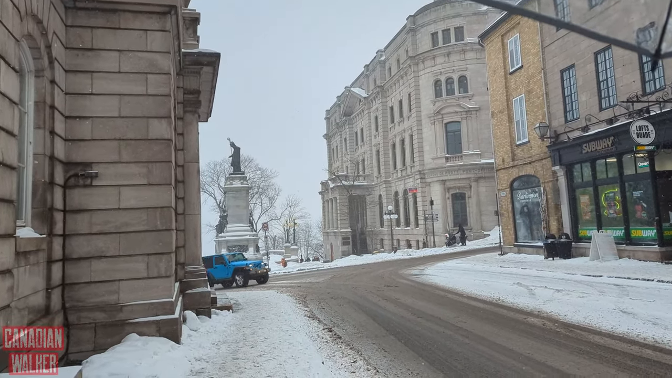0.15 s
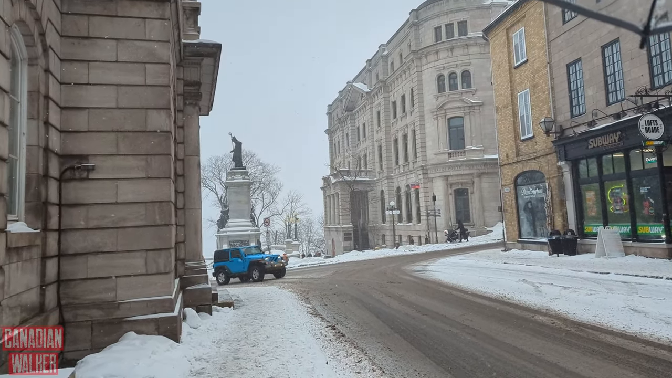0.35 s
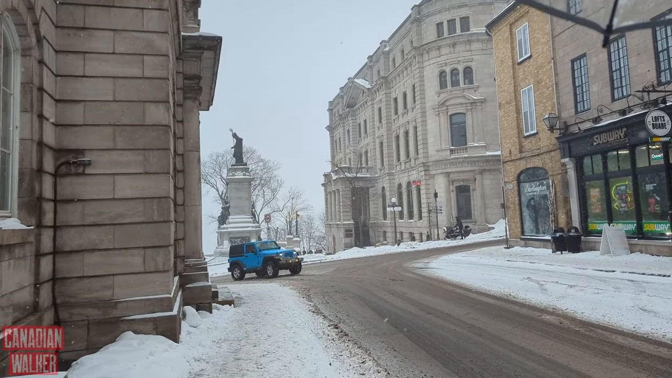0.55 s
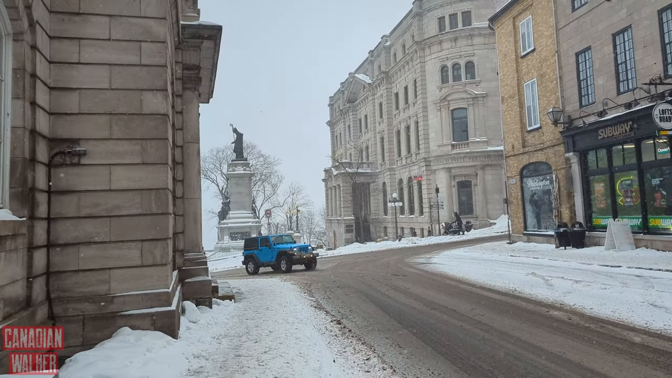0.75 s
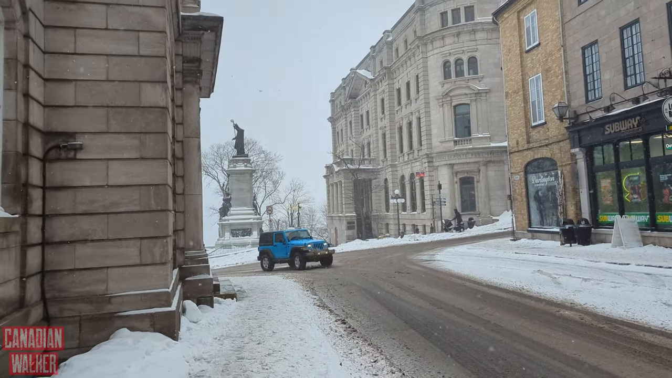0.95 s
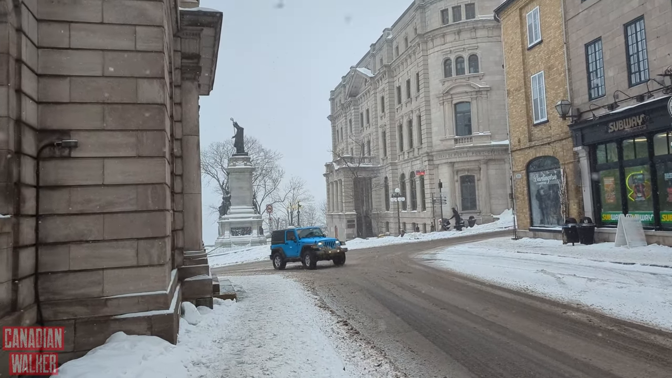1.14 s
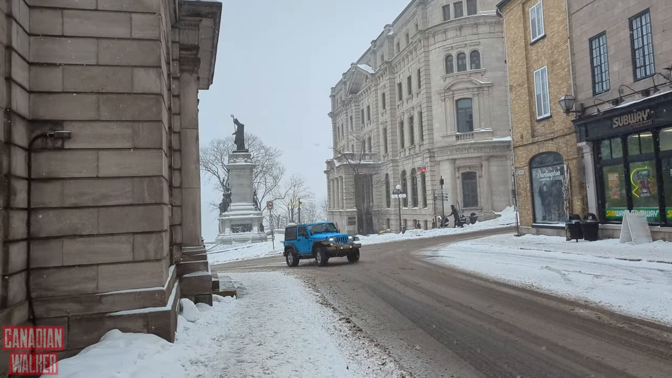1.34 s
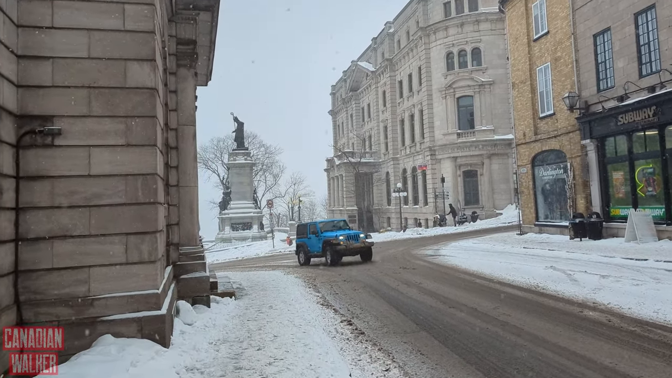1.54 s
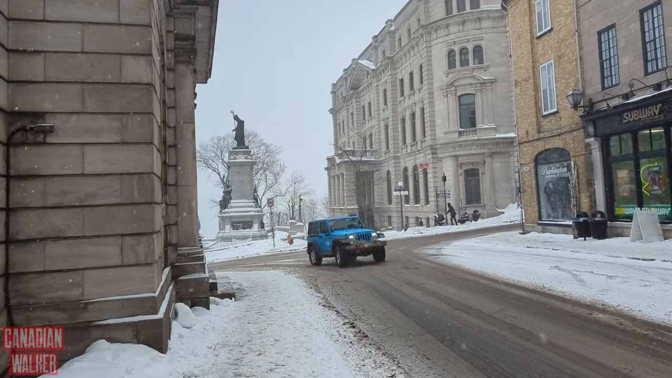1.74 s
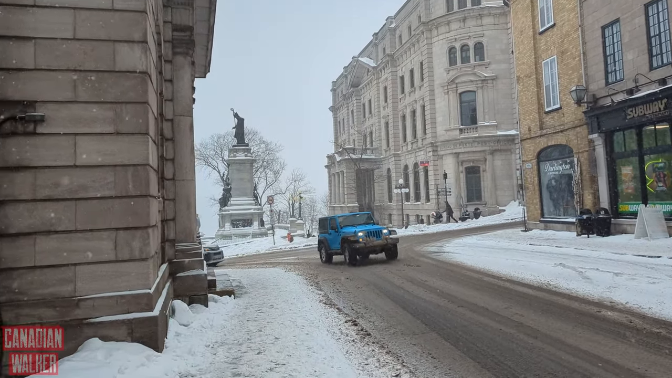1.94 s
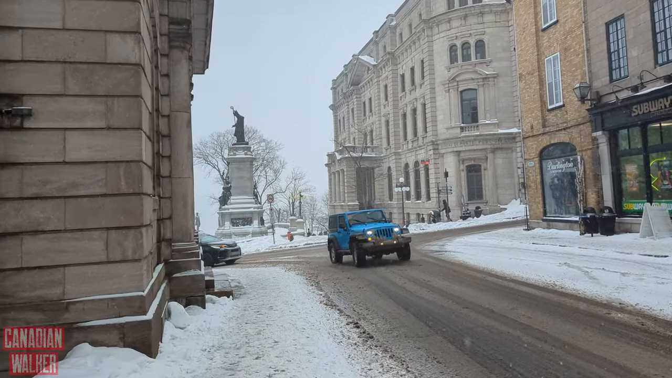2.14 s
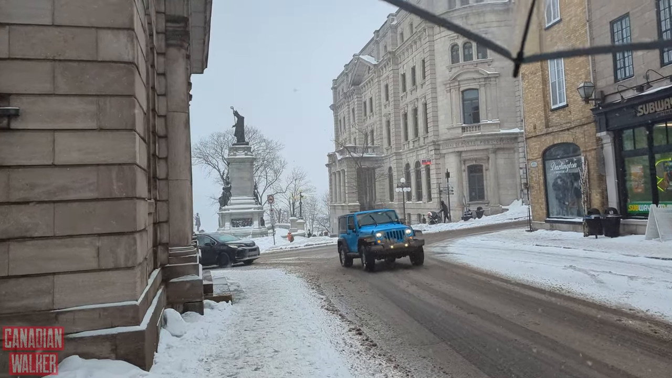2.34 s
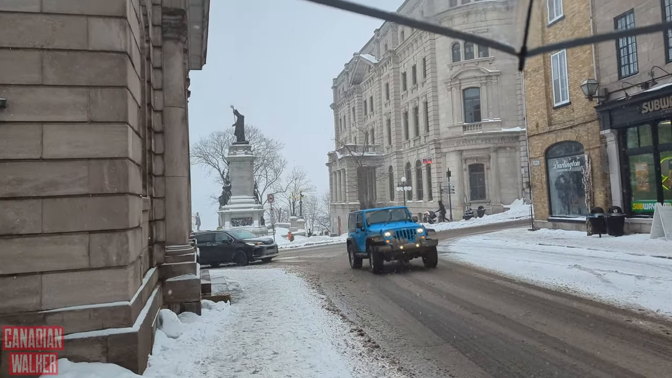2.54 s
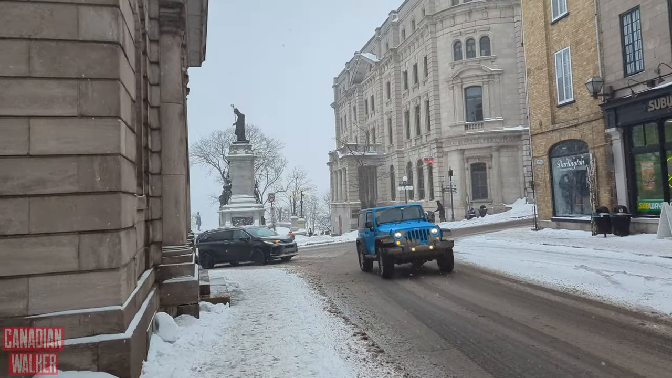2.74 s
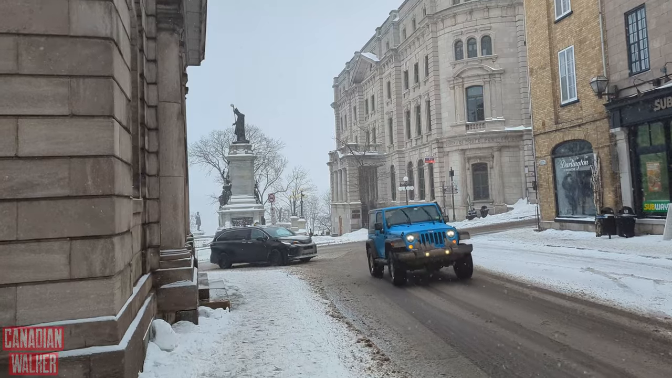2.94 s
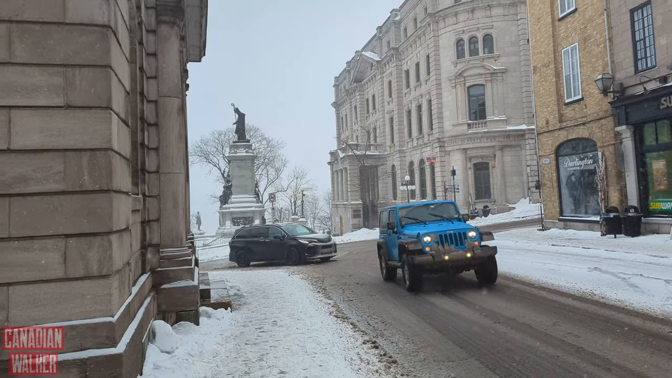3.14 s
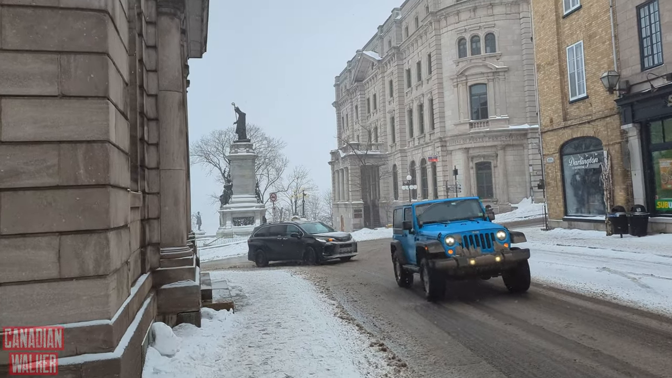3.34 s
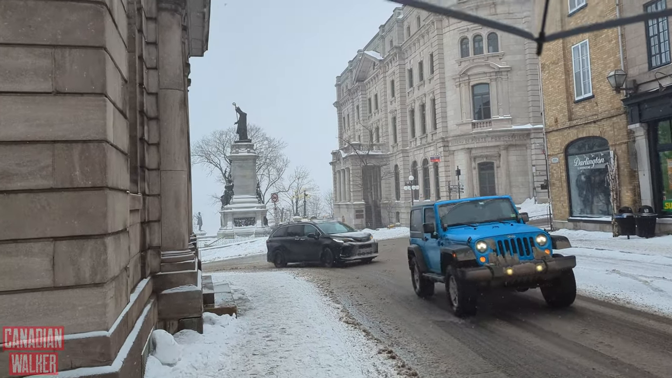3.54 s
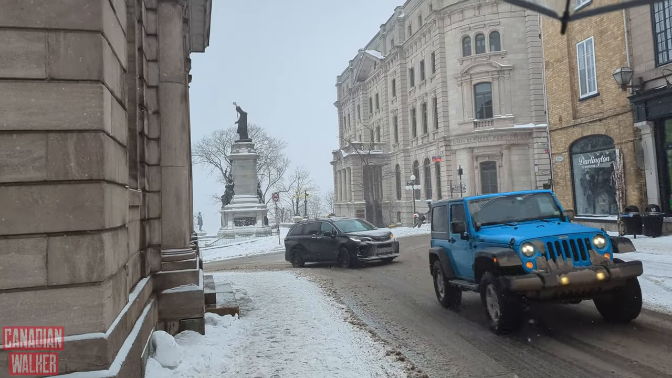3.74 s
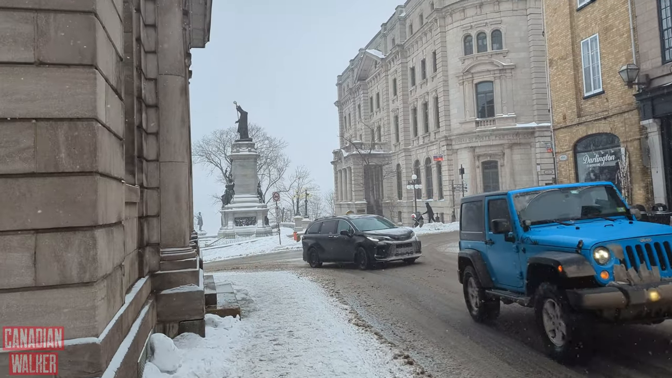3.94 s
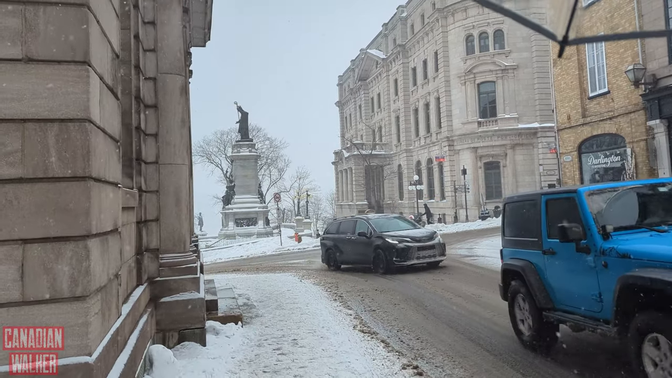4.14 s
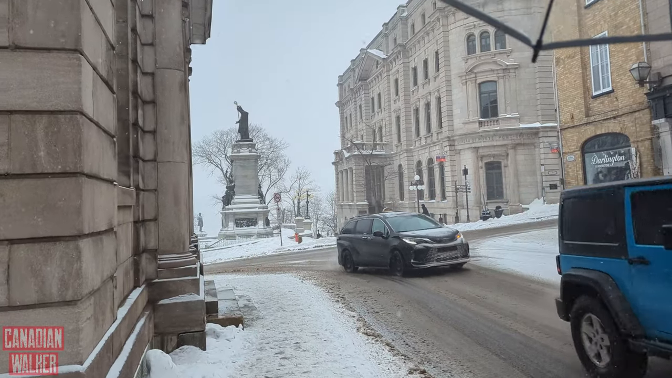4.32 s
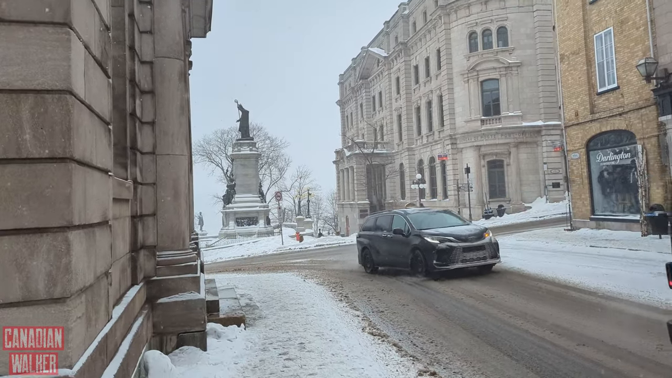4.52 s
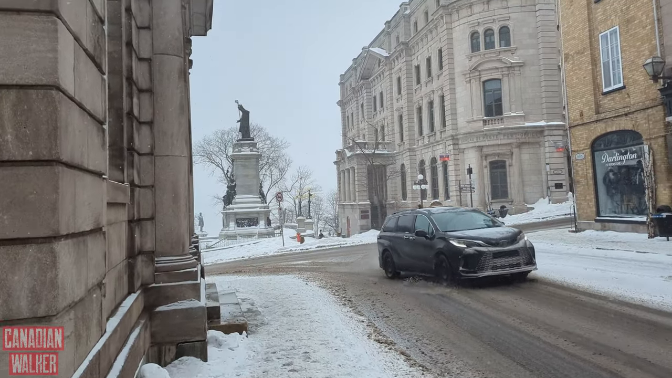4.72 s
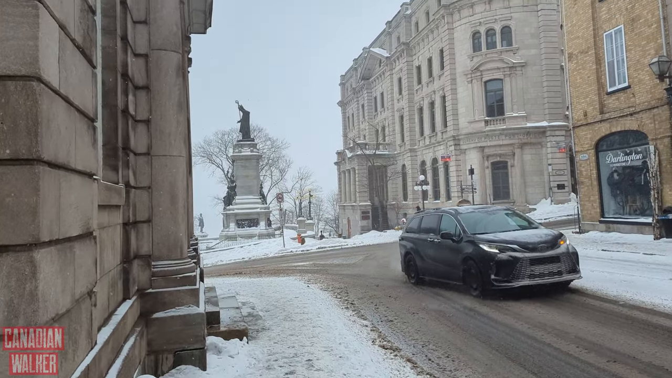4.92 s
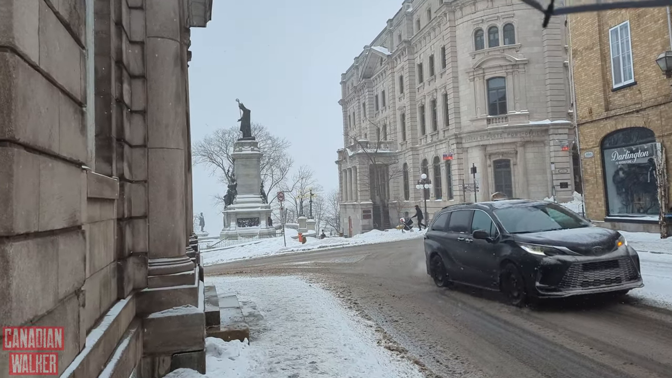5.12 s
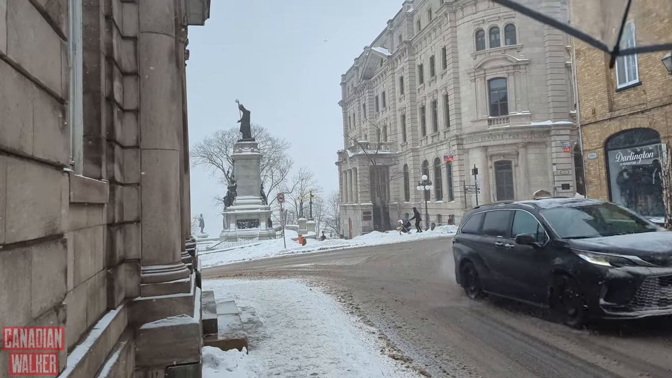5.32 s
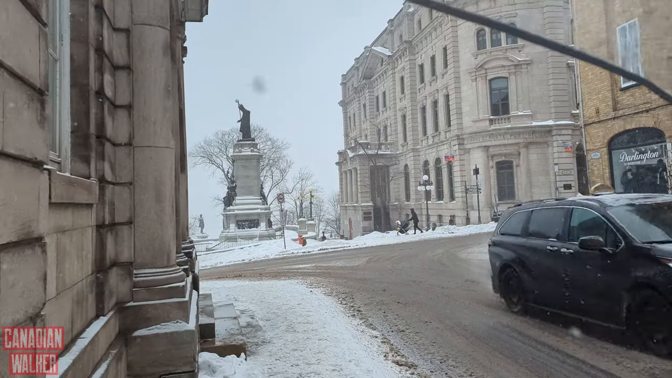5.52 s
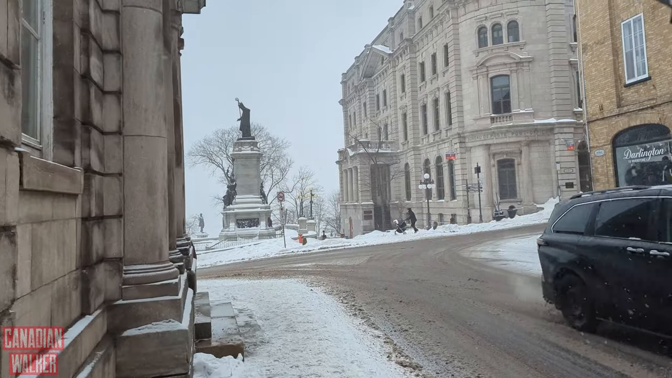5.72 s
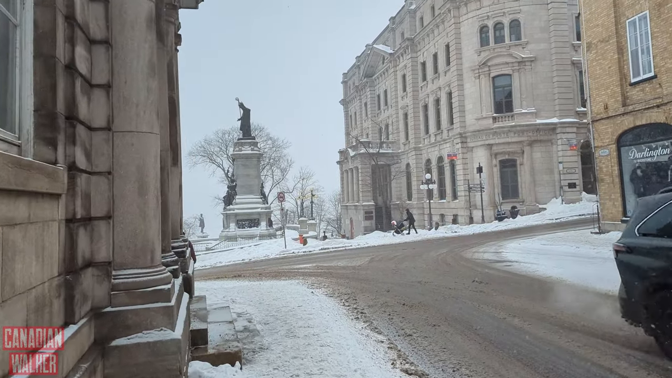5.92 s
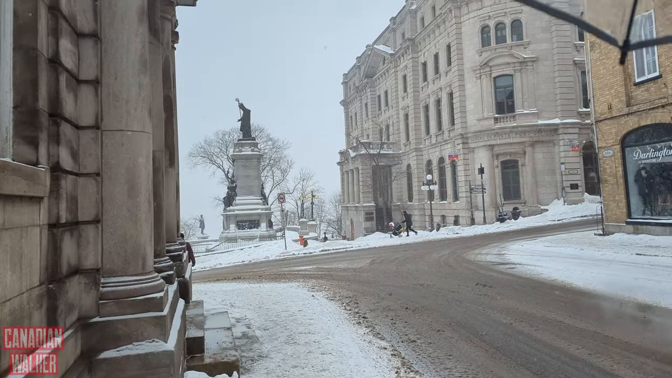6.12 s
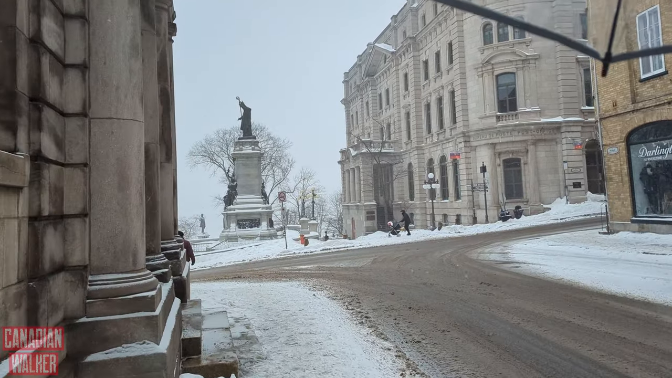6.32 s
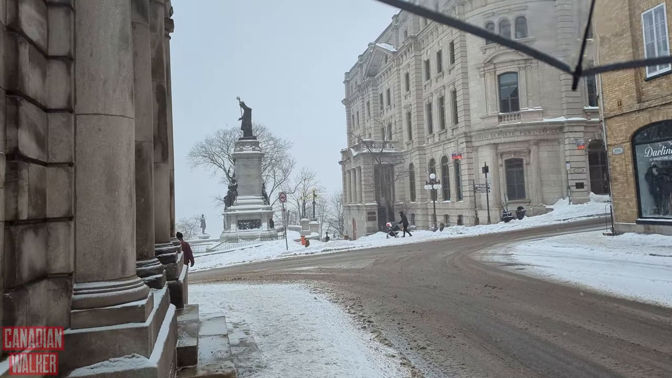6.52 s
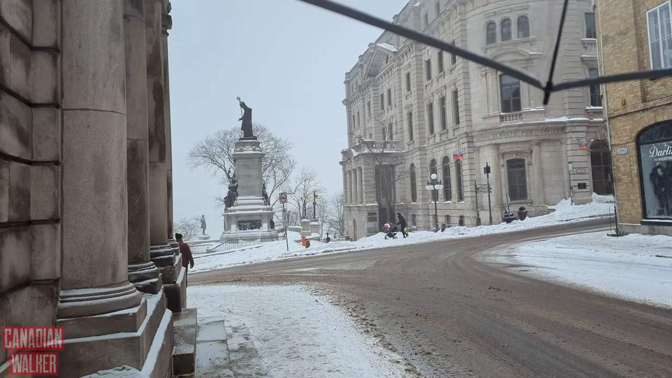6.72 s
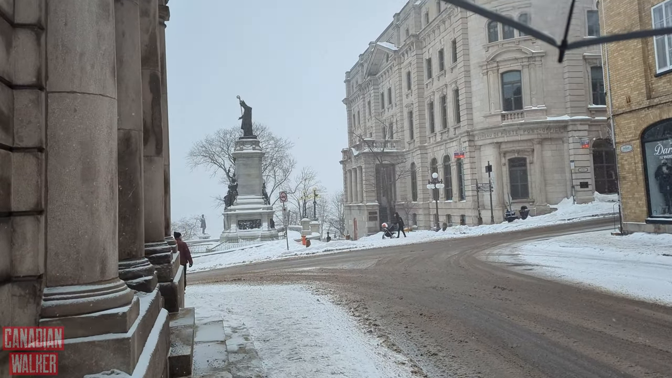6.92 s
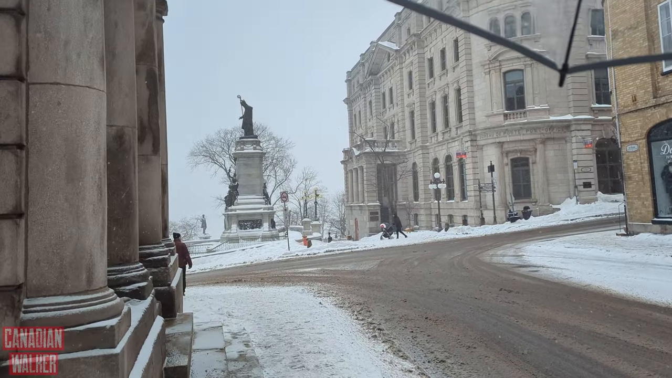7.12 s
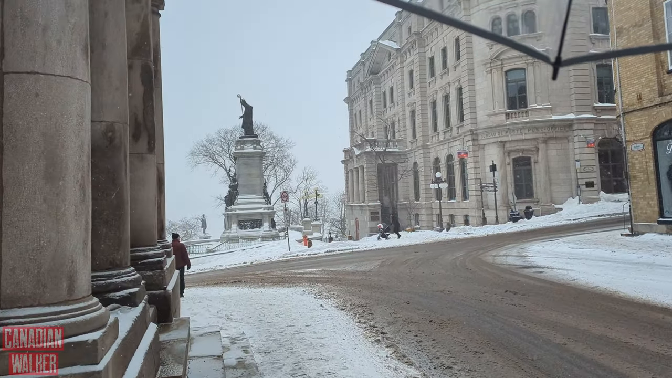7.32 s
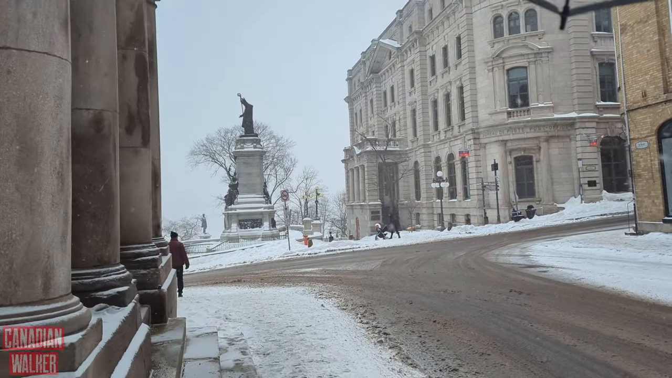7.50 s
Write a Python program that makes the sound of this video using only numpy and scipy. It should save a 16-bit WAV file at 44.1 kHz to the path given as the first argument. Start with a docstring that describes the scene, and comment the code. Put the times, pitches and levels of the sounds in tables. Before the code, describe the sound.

A walker's stereo microphone beside a stone building on a snowy city street. From 0 to 1 second there is mostly soft low rumble, faint distant tyre noise and dull wind thumps on the right. From about 1.3 seconds the tyres become clearer, a broad airy midrange roar with a slightly wandering tread tone, growing steadily. Around 3.4 to 4 seconds it swells strongly and bright, grainy slush spray joins; the first car sweeps to the right, spray strongest from 4 to 5. The second car follows almost without a gap, its roar full around 6 to 6.7 seconds with less hiss. After 6.9 it drops quickly, fading to distant wash by 7.5. Irregular short gusts buffet throughout, mostly right, with narrow low moans near 3.7, 4.1 to 4.7 and 6.6 seconds. The low end thins momentarily on one side or the other.

```python
"""Tyres of two cars roar past from left to right on a wet, slushy street between stone fronts.
The roar is shaped noise with a wandering tread resonance; the spray is treble hiss made grainy by slush.
Short bands of noise are gusts buffeting two microphones, mostly the right one; a few are narrow moans.
Low noise rumbles behind, and for moments the low end of tyres and rumble drops away on one microphone."""
import sys
import numpy as np
from scipy import signal
from scipy.fft import rfft, irfft
from scipy.io import wavfile
from scipy.ndimage import uniform_filter1d

SR = 44100
rng = np.random.default_rng(int(sys.argv[2]) if len(sys.argv) > 2 else 0)


def wav_out(sig):
    """Save sig, one row per channel (or a flat mono array), as 16-bit PCM at SR to the path in sys.argv[1]."""
    wavfile.write(sys.argv[1], SR, np.round(np.clip(np.atleast_2d(sig).T, -1, 1) * 32767).astype(np.int16))


def decibels_to_gain(level_db):
    """Convert a level in decibels to a linear amplitude gain (20 dB per decade)."""
    exponent = np.asarray(level_db, float) / 20
    return 10 ** exponent


N = 333396  # length [samples]
FRAME, HOP = 1024, 256  # short-time spectra [samples]

# Tyres on the wet street: (time [s], roar before a 2 dB lift [dB], spray over roar before a 1.5 dB lift [dB],
# tread resonance less 1.5 dB [dB], tilt about 2 kHz [dB per octave, one octave each way], resonance [Hz])
TYRES = [(0.0, -43, -10, 3.5, 2.3, 2060), (0.55, -47, -6.5, 4, 2.3, 2150), (0.95, -44, -11, 5, 0.6, 2060),
         (1.28, -36.5, -15.5, 6, 1, 1950), (1.56, -38, -10, 4.5, 0.6, 2100),
         (2.21, -34, -12, -1.5, -0.7, 2130), (3.37, -29.5, -5.5, 2.5, 2.4, 2020),
         (3.54, -27, -5.5, -0.5, 1.1, 2070), (3.98, -26, 0.5, 2, -0.2, 2130), (4.59, -23, 2, 7, -3.8, 2240),
         (4.74, -23.5, 2, 2.5, -1.2, 1900), (4.84, -27, 4, 0, -0.5, 2240), (4.88, -24, 3, 1, 0, 2000),
         (5.07, -23.5, 1, 5, 1.8, 2190), (5.33, -24.5, -4, -1, 0.7, 2150), (5.69, -25.5, -3.5, 2, 0, 2080),
         (6.08, -22.5, -4, 6, -1, 2170), (6.38, -23, -3, 5, -0.2, 2110), (6.48, -22.5, -4.5, 3, 1.2, 2000),
         (6.65, -23, -6, 7, 0.5, 2050), (6.89, -29, -4, -2, -1, 1920), (7.01, -28.5, -9.5, -0.5, 0.2, 1970),
         (7.48, -34, -9.5, 2.5, 4.2, 2250), (7.56, -35.5, -10, -1, 4.5, 2150)]
# Colour of the roar before resonance, tilt and dip: (frequency [Hz], relative density [dB])
ROAR_COLOUR = [(300, -60), (450, -36), (600, -23.5), (800, -14.5), (1000, -6.5), (1400, -2), (2200, -3.5),
               (3300, -4.5), (4200, -12.5), (6000, -17), (9000, -27)]
# Four bands of the roar that swell and thin on their own:
# (time [s], boost at 663 Hz [dB], at 974 Hz [dB], at 1465 Hz [dB], at 3000 Hz [dB])
BAND_SWELLS = [(0, 3.6, 3.5, 0.89, 2), (.9, 26, 3.5, 0.6, 3.9), (1.5, 3.2, -1, 4.3, 3.2),
               (2.0, 8.5, 0, 4.2, 3.6), (2.7, 2.4, -1.5, 6.1, 1.4), (3.35, 6.8, 8.5, 2.3, 1.5),
               (3.8, 2.2, -2.5, 1.8, 1.4), (4.4, 2.5, 5, 4.5, 5.5), (4.86, 16.3, 1, 1.2, 1.3),
               (5.3, 1.8, 6, 0.62, 3.8), (5.8, 1.9, 2.5, 2.1, 0.93), (6.5, 1.3, 7.5, 7.2, 0.71),
               (6.9, 18, 3, 4.6, 0.98), (7.3, 12, 8.5, 3.5, 0.79), (7.56, 7.9, 10, 1.7, 1.5)]
# A dip in the lower roar, perhaps the echo off the road cancelling the direct sound:
# (time [s], centre [Hz], depth [dB])
ROAD_DIP = [(0, 880, 3), (.7, 880, 3), (1.35, 850, 16), (1.75, 960, 6), (2.3, 900, -1), (2.8, 830, 5),
            (3.3, 1140, 3.5), (3.75, 1180, 12), (4.2, 1190, -1)]


def roar():
    """Air pumped out of the tread blocks: broad noise with a wandering resonance."""
    t, hz = grid()
    roar_db, _, tread_db, tilt_db, tread_hz = follow(TYRES, t)
    octave = np.log2(hz + 1)
    colour_db = read(ROAR_COLOUR, hz) + (1.5 + tread_db) * bump(octave, tread_hz, 0.32)
    colour_db += tilt_db * np.clip(octave - np.log2(2000), -1, 1)
    band_hz, band_octaves = (663, 974, 1465, 3000), (0.1, 0.39, 0.19, 0.17)
    for centre_hz, octaves, boost_db in zip(band_hz, band_octaves, follow(BAND_SWELLS, t)):
        colour_db += boost_db * bump(octave, centre_hz, octaves)
    dip_hz, dip_db = follow(ROAD_DIP, t)
    colour_db -= dip_db * bump(octave, dip_hz, 0.21)
    colour_db += 0.7 * patches(6, 90)  # narrow bands drift up and down by chance
    lumps_db = 1.35 * patches(3, 30) + 0.32 * patches(14, 16) + 0.23 * patches(200, 4)
    gain = unit_band(colour_db, hz, 1000, 3050) * decibels_to_gain(roar_db + lumps_db + 2.0)
    air = sounded(at_microphones(hz, t) * gain)
    return air * splashes(300, 0.16, 0.98)


# Colour of the slush spray: (frequency [Hz], relative density [dB])
SPRAY_COLOUR = [(700, -70), (2000, -10), (4000, -1), (5500, -1.5), (7500, -1), (8900, 0.5), (10000, -2.5),
                (11200, 0.1), (12200, -8), (15500, -8.5), (17000, -36)]


def spray():
    """Slush thrown off the wheels: treble hiss, made grainy by droplets of uneven size."""
    t, hz = grid()
    roar_db, over_db = follow(TYRES, t)[:2]
    lumps_db = 0.78 * patches(40, 12) + 0.63 * patches(300, 14)
    lumps_db += 1.7 * patches(90, 14) * (hz > 11500)  # the highest treble flickers
    colour = unit_band(read(SPRAY_COLOUR, hz), hz, 4060, 16400)
    hiss = sounded(at_microphones(hz, t) * colour * decibels_to_gain(roar_db + over_db + lumps_db + 1.5))
    return hiss * splashes(700, 0.24, 0.95)


def splashes(per_s, depth, fade):
    """A gain that jumps as lumps of slush of uneven size are struck, each fading in about a millisecond."""
    lumps = (rng.random(N) < per_s / SR) * rng.exponential(1, N)
    return evened(1 + depth * signal.lfilter([1], [1, -fade], lumps))


# Cars, first then second: (middle of the sweep [s], time scale of the sweep [s],
# left microphone late when past [ms], into earshot [s], out of earshot [s])
CARS = [(4.3, 1.3, .58, -.4, 5.3), (5.7, .7, .48, 5.3, 7.4)]
# Left over right microphone for the tyres: (frequency [Hz], balance [dB])
BALANCE = [(60, -1), (92, -27), (140, 4), (210, -21), (330, -64), (500, -6), (770, 0.5), (1170, 1),
           (1790, 0), (2740, -1.5), (4190, 1), (6410, -2), (9810, -11.5), (15000, 1)]
# Likeness of the two microphones, scaling each direct share: (frequency [Hz], likeness [0..1])
LIKENESS = [(300, .3), (550, .7), (1000, .72), (1500, .68), (2500, .52), (5000, .25), (10000, .12)]


def at_microphones(hz, t):
    """Noise from each car and off the left wall reaches both microphones, one later; the rest is unrelated."""
    wall_ms, wall_share = -0.45, 0.2  # off the stone wall on the left: left microphone first
    (first_ms, first), (second_ms, second) = [bearing(t, *car) for car in CARS]
    alike = np.clip(read(LIKENESS, hz), 0, 1)
    shares = alike * np.clip([first, second, wall_share + 0 * t], 0, 1)[:, None]
    shares /= np.maximum(shares.sum(0), 1)
    *direct, left, right = static(count=5)
    pair = np.sqrt(abs(1 - shares.sum(0))) * np.array([left, right])
    for share, late_ms, source in zip(shares, (first_ms, second_ms, wall_ms), direct):
        turn = np.exp(-1j * np.pi * hz * late_ms / 1000)  # half the delay on each side
        pair += np.sqrt(share) * source * np.array([turn * np.ones_like(t), np.ones_like(t) / turn])
    return pair * decibels_to_gain(read(BALANCE, hz) * np.array([.5, -.5])[:, None, None])


def bearing(t, middle_s, sweep_s, past_ms, in_s, out_s):
    """Delay of the left microphone and share of direct sound as one car sweeps to the right."""
    far_ms, direct_share, fade_s = -0.03, 0.85, 0.45
    late_ms = far_ms + (past_ms - far_ms) * step(t, middle_s, sweep_s)
    return late_ms, direct_share * step(t, in_s, fade_s) * (1 - step(t, out_s, fade_s))


# Stronger gusts, each on one microphone; they start 10 ms sooner and last 25 ms longer than listed:
# (time [s], length [s], centre [Hz], rms before the taper [dB], microphone [0 left, 1 right])
GUSTS = [(0.01, .04, 150, -51, 1), (0.108, 0.04, 171, -41.5, 1), (0.16, 0.14, 74, -29.5, 1),
         (0.355, 0.054, 183, -26, 1), (0.369, 0.053, 341, -33, 1), (0.428, 0.12, 347, -47.5, 1),
         (0.848, 0.041, 408, -46.5, 0), (0.632, 0.079, 574, -55, 0), (0.96, 0.052, 72, -40, 1),
         (0.984, 0.078, 223, -45.5, 1), (1.106, 0.033, 131, -36, 1), (1.291, 0.21, 440, -63, 0),
         (1.299, .08, 86.5, -51, 1), (1.456, 0.11, 248, -46.5, 1), (1.463, 0.084, 86, -38, 1),
         (1.59, 0.099, 233, -40.5, 1), (1.77, .17, 380, -55, 0), (1.93, 0.012, 490, -43, 0),
         (2.175, 0.033, 134, -34, 1), (2.405, 0.11, 57, -33.5, 1), (2.427, 0.057, 388, -43.5, 1),
         (2.515, 0.12, 220, -37.5, 1), (2.685, 0.05, 333, -33, 1), (2.726, 0.08, 46, -37.5, 0),
         (2.803, 0.12, 79.5, -48, 0), (2.814, 0.038, 283, -34, 1), (2.821, 0.083, 82, -49, 1),
         (3.112, 0.073, 260, -44, 1), (3.12, 0.082, 430, -44, 1), (3.13, 0.22, 70, -57, 1),
         (3.218, 0.04, 257, -48, 1), (3.31, 0.076, 256, -48, 1), (3.412, 0.033, 720, -36, 1),
         (3.437, 0.091, 456, -38, 0), (3.44, 0.19, 584, -42.5, 0), (3.458, 0.12, 279, -32, 0),
         (3.685, 0.21, 232, -44, 1), (3.689, 0.31, 645, -45.5, 1), (3.877, 0.16, 370, -46, 1),
         (3.908, 0.039, 130, -28, 1), (3.914, 0.13, 288, -41, 1), (4.336, 0.1, 306, -42, 1),
         (4.535, 0.053, 133, -43.5, 1), (4.637, 0.094, 289, -32, 1), (4.683, 0.037, 603, -37, 1),
         (4.72, 0.034, 40, -45, 1), (4.732, 0.1, 305, -46, 1), (4.825, 0.2, 465, -45, 0),
         (4.948, .05, 250, -49, 0), (5.346, 0.26, 70, -55, 0), (5.19, 0.12, 520, -47, 1),
         (5.774, 0.067, 57, -33, 1), (5.787, 0.06, 374, -38, 1), (5.813, 0.091, 627, -35.5, 1),
         (5.853, 0.043, 199, -46.5, 1), (5.59, 0.23, 520, -55, 1), (5.98, .09, 500, -51.5, 1),
         (6.004, 0.075, 134, -53, 1), (6.458, 0.064, 268, -51.5, 1), (6.46, 0.081, 507, -47, 1),
         (6.557, 0.056, 405, -42, 1), (6.623, 0.03, 396, -25, 1), (6.663, 0.14, 398, -38, 1),
         (6.811, 0.23, 474, -41.5, 1), (6.846, 0.052, 370, -34.5, 1), (6.828, 0.046, 64, -42, 1),
         (6.892, 0.252, 172, -35, 1), (6.95, 0.15, 238, -34, 1), (7.083, 0.053, 257, -27.5, 1),
         (7.232, 0.018, 342, -46, 1), (7.324, 0.046, 129, -33, 1), (7.358, 0.029, 290, -33.5, 1),
         (7.391, 0.16, 273, -41, 1)]
# Moans on the right microphone, 25 ms longer than listed:
# (time [s], length [s], centre [Hz], rms before the taper [dB])
MOANS = [(3.698, 0.31, 263, -46), (4.07, 0.31, 294, -61), (4.301, 0.17, 291, -38.5),
         (4.453, .25, 285, -34.5), (6.622, 0.26, 295, -40.5)]


def wind():
    """Turbulence at the microphones: gusts and narrow-band moans, each on one of the two."""
    out, rows = np.zeros((2, N)), [*faint_gusts(), *GUSTS]
    moan_noise = rng.standard_normal((len(MOANS), 32768))
    for (s, length, centre_hz, level_db), noise in zip(MOANS, moan_noise):
        add(out[1], s, gust(length, centre_hz, 48, level_db, noise))
    gust_noise = rng.standard_normal((len(rows), 16384))
    for (s, length, centre_hz, level_db, side), noise in zip(rows, gust_noise):
        width_hz = 68 + 0.19 * centre_hz
        add(out[round(side)], max(s - .01, 0), gust(length, centre_hz, width_hz, level_db, noise))
    return out


def gust(length, hz, width_hz, level_db, noise):
    """A band of turbulent pressure with weak wide skirts, tapered briefly at both ends."""
    size = round((length + 0.025) * SR)
    f = np.fft.rfftfreq(len(noise), 1 / SR)
    core = np.exp(-((f - hz) / width_hz / 0.45) ** 2)  # 1/e at 0.45 of the width either side
    skirts = decibels_to_gain(-25) * np.exp(-((f - hz) / 250) ** 2)
    bass_cut = np.clip(f / 36, 0, 1) ** 3
    band = irfft(rfft(noise) * (core + skirts) * bass_cut)[:size]
    taper = signal.windows.tukey(size, np.clip(0.059 / (length + 0.014), 0, 1))
    return decibels_to_gain(level_db) * evened(band) * taper


def faint_gusts():
    """Thirty weak gusts drawn by chance, as rows like GUSTS; a lull on that microphone weakens them."""
    when, long, high, strong, side = rng.random((30, 5)).T
    s, hz = when * N / SR, 60 + (600 - 60) * high
    microphone = (side < 0.8).astype(int)  # most on the right
    lull_db = lulls()[microphone, (hz * FRAME / SR).round().astype(int), (s * SR / HOP).astype(int)]
    level_db = -52.5 + 10.5 * (2 * strong - 1) - lull_db
    return np.transpose([s, 0.085 * (.5 + long), hz, level_db, microphone])


# Low rumble of air and street: (frequency [Hz], relative density [dB])
RUMBLE_COLOUR = [(20, -25), (32, -15), (50, 10.5), (110, -3.5), (160, -1.5), (250, -3.5), (400, 2.5),
                 (600, 2), (800, 2), (1200, -24)]


def rumble():
    """Low noise of air and street, unrelated at the two microphones, lumpy in time and frequency."""
    t, hz = grid()
    level_db = np.reshape((-60.5, -57.5), (2, 1, 1))  # left, right, before the swells and lumps
    swell_db = 3 * np.array([patches(40, 90), patches(40, 90)])
    lumps_db = 4.5 * np.array([patches(4, 12), patches(4, 12)])
    colour = unit_band(read(RUMBLE_COLOUR, hz), hz, 30, 800)
    low = sounded(static(count=2) * colour * decibels_to_gain(level_db + swell_db + lumps_db))
    return signal.sosfilt(signal.butter(4, 42, "high", fs=SR, output="sos"), low)


# Moments when the low end drops away on one microphone:
# (time [s], length [s], lower edge [Hz], upper edge [Hz], microphone [0 left, 1 right])
LULLS = [(0.01, 0.4, 120, 455, 0), (.44, 0.15, 130, 480, 0), (0.423, 0.28, 470, 640, 1),
         (0.735, 0.23, 120, 656, 1), (.92, 0.42, 130, 420, 0), (1.556, 0.22, 100, 570, 0),
         (1.56, 0.22, 328, 566, 1), (1.723, 0.22, 120, 650, 1), (2.09, 0.47, 180, 480, 0),
         (2.196, 0.29, 296, 556, 1), (2.493, 0.2, 120, 560, 0), (2.887, 0.22, 100, 734, 1),
         (3.058, 0.48, 130, 590, 0), (3.47, 0.3, 149, 735, 1), (3.684, .4, 130, 560, 0),
         (4.1, 0.43, 130, 300, 0), (4.08, .2, 318, 420, 1), (4.3, 0.39, 60, 230, 1),
         (4.53, 0.15, 350, 450, 1), (4.88, 0.146, 60, 600, 1), (5.244, 0.48, 119, 372, 1),
         (5.295, 0.64, 140, 396, 0), (5.92, 0.068, 80, 480, 1), (6.088, 0.38, 101, 423, 1),
         (6.196, 0.62, 100, 396, 0), (6.55, .33, 120, 240, 1), (6.86, 0.83, 100, 560, 0),
         (7.156, 0.11, 100, 300, 1)]


def lulls():
    """How many dB the low end falls away, per microphone, frequency and time."""
    t, hz = grid()
    fall_db = np.zeros((2, len(hz), len(t)))
    for s, length, lo_hz, hi_hz, side in LULLS:
        when = np.clip(np.minimum(t - s, s + length - t) / 0.018 + .5, 0, 1)
        where = np.clip(np.minimum(hz - lo_hz, hi_hz - hz) / 60 + .5, 0, 1)
        fall_db[round(side)] += 14 * when * where  # overlapping lulls add up
    return fall_db


def lulled(x):
    """Lets the low end of a sound fall away during the lulls."""
    z = signal.stft(x, nperseg=FRAME, noverlap=FRAME - HOP)[2]
    z = z * decibels_to_gain(-lulls()[..., :z.shape[-1]])
    return signal.istft(z, nperseg=FRAME, noverlap=FRAME - HOP)[1][:, :N]


def evened(x):
    """Scales to an rms of 1."""
    return x / np.sqrt(np.mean(np.abs(x) ** 2) + 1e-20)


def read(points, hz):
    """Reads a spectrum on a log-frequency axis."""
    f, value = np.transpose(points)
    return np.interp(np.log(hz + 1), np.log(f + 1), value)


def follow(rows, t):
    """Reads every column of a curve at the times t."""
    s, *columns = np.transpose(rows)
    return [np.interp(t, s, c) for c in columns]


def bump(octave, centre_hz, octaves):
    """A bell of height 1 on the octave axis, down to 1/e at so many octaves either side."""
    return np.exp(-((octave - np.log2(centre_hz)) / octaves) ** 2)


def step(t, s, time_s):
    """A smooth rise from 0 to 1 around s."""
    return .5 + .5 * np.tanh((t - s) / time_s)


def add(mix, s, sound):
    """Mixes a sound in at s seconds."""
    part = mix[round(s * SR):][:len(sound)]
    part += sound[:len(part)]


def grid():
    """Times (row) and frequencies (column) of the short-time spectra."""
    return np.arange(N // HOP + 5) * HOP / SR, np.fft.rfftfreq(FRAME, 1 / SR)[:, None]


def static(count):
    """Complex white spectra of power 1."""
    t, hz = grid()
    a, b = rng.standard_normal((len(t), len(hz), count, 2)).T
    return (a + 1j * b) / np.sqrt(2)


def patches(bins, frames):
    """A random field of unit spread, lumpy over so many bins and frames."""
    field = static(count=1)[0].real
    return evened(uniform_filter1d(uniform_filter1d(field, bins, 0), frames, 1))


def sounded(z):
    """Short-time spectra to sound; power summed over bins becomes mean square."""
    return signal.istft(z, nperseg=FRAME, noverlap=FRAME - HOP)[1][:, :N] * np.sqrt(3)


def unit_band(db, hz, lo_hz, hi_hz):
    """Gain of a spectrum whose power between lo and hi sums to 1."""
    gain = decibels_to_gain(db) * np.ones_like(hz)
    inside = (hz > lo_hz) & (hz < hi_hz)
    return gain / np.sqrt((gain ** 2 * inside).sum(0))


def scene():
    """Tyres and rumble, hushed in the lulls, and the wind at the microphones."""
    return lulled(roar() + spray() + rumble()) + wind()


def roll_off(x):
    """The treble ends steeply here."""
    return signal.sosfilt(signal.butter(12, 16480, fs=SR, output="sos"), x)


def record(dry):
    """Both microphones lose the treble above a steep edge at 15780 Hz."""
    edge = signal.firwin(1023, 15780, window=("kaiser", 10), fs=SR)
    mix = signal.oaconvolve(dry, edge[None], "same")
    return roll_off(mix)


dry = scene()
out = record(dry)
wav_out(out)
```